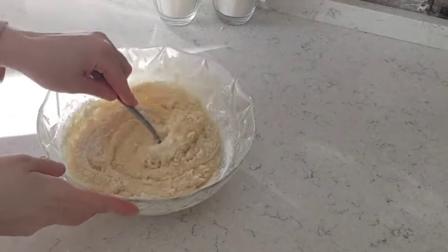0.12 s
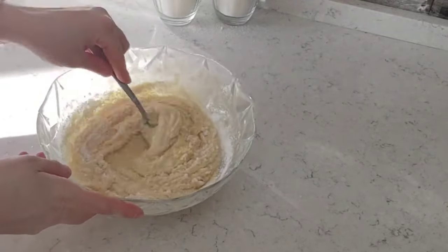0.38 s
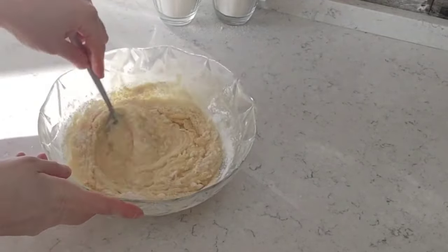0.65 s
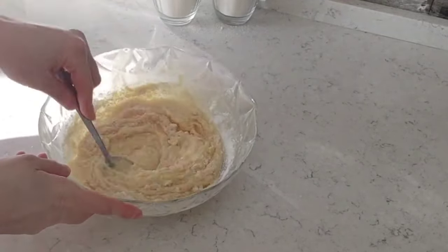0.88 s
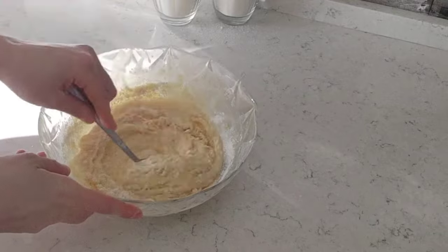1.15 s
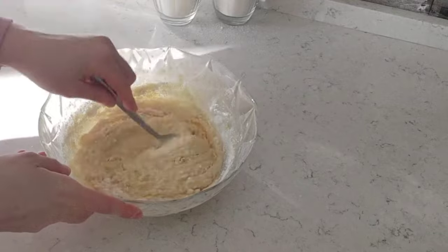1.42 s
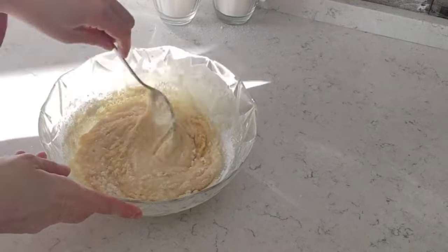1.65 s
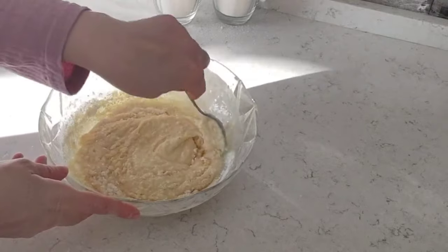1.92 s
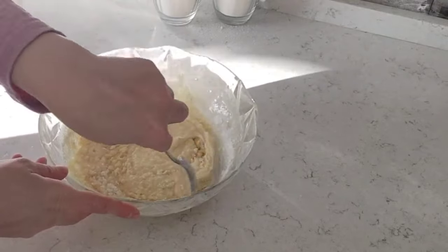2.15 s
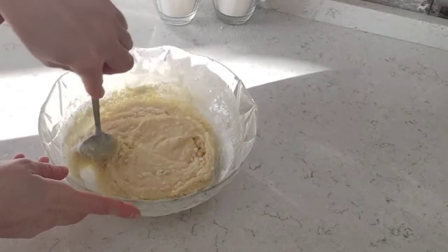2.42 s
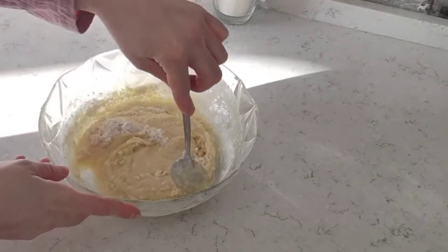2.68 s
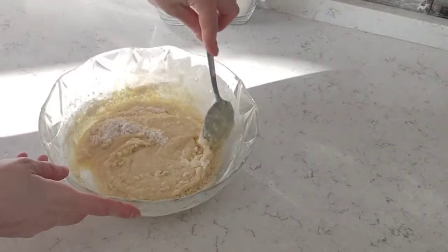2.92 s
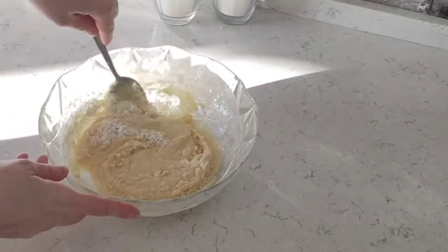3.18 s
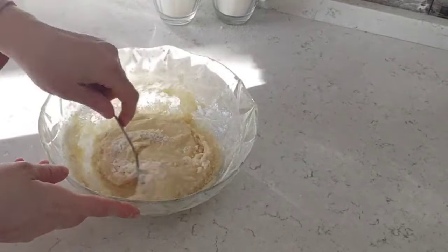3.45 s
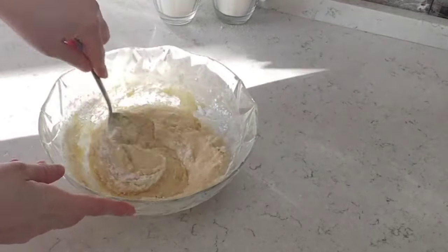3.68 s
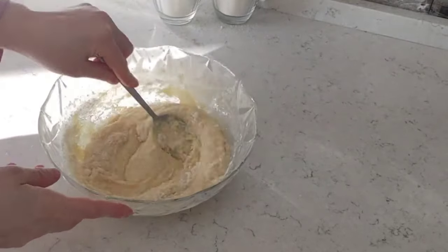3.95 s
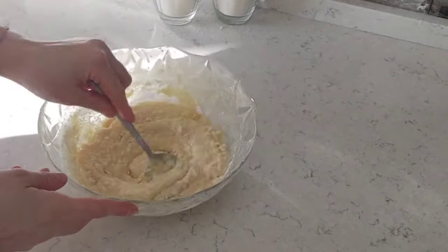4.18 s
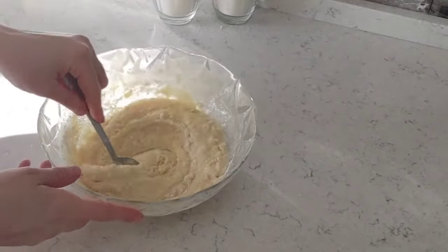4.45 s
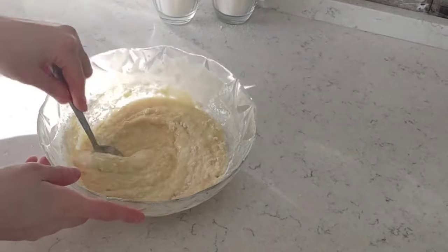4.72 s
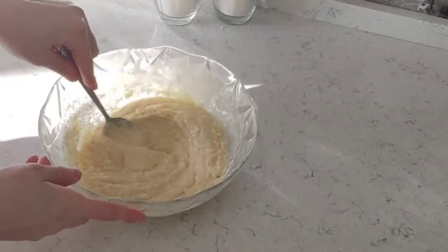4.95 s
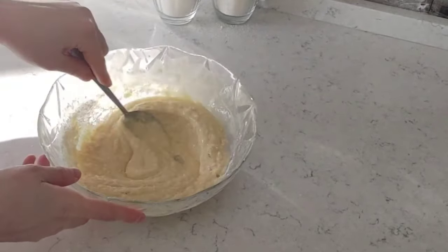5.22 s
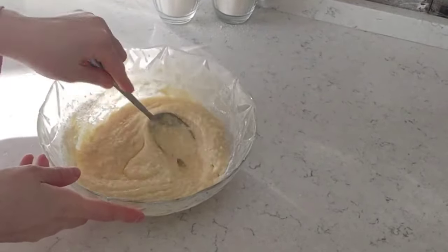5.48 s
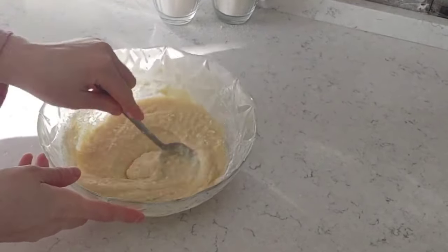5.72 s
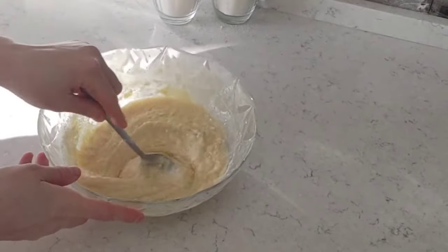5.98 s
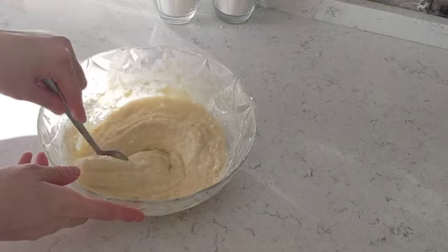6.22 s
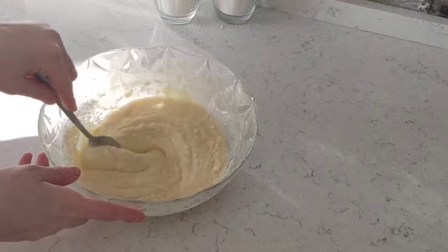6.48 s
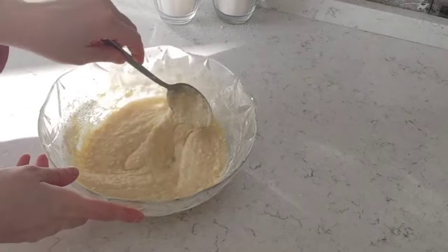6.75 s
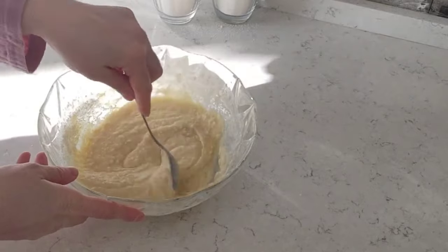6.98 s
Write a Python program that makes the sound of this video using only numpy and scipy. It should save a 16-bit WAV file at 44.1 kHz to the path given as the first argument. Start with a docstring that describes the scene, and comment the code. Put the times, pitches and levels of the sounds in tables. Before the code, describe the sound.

A steel spoon works thick batter in a glass bowl on a stone counter. Muffled knocks and light clinks come in irregular clusters with short gritty scrapes, thin out briefly, turn brighter on the bare wall, then become louder and faster before easing off. Close stereo microphone in a small hard-surfaced kitchen, with a short lively echo, low wavering rumble and faint hiss.

```python
"""A steel spoon stirs thick batter in a glass bowl on a stone counter, close to the microphone.
Each knock is a tick, clink, clack and thud that strikes the damped modes of the bowl; between knocks
the sliding edge rasps in clumps of tiny contacts. The small hard kitchen answers with first echoes
and a decaying tail, over a wavering low rumble and a faint hiss."""
import sys
import numpy as np
from scipy import signal
from scipy.fft import rfft, irfft, next_fast_len
from scipy.io import wavfile
from scipy.ndimage import uniform_filter1d, map_coordinates

SR = 44100
rng = np.random.default_rng(int(sys.argv[2]) if len(sys.argv) > 2 else 0)


def pcm_store(signal):
    """Save signal as 16-bit PCM."""
    levels = np.round(np.clip(np.atleast_2d(signal), -1, 1) * 32767)
    wavfile.write(sys.argv[1], SR, levels.astype(np.int16).T)


def to_linear_factor(level_db):
    """Convert decibel levels (scalar or array-like) to linear amplitude factors."""
    exponent = np.asarray(level_db, float) / 20
    return 10 ** exponent


N = 313992  # samples, about 7.12 s


def unit(x):
    """Scaled to rms 1."""
    return x / np.sqrt(np.mean(x ** 2) + 1e-20)


def along(points, hz):
    """(frequency [Hz], value) points read on a log frequency axis."""
    f, v = np.transpose(points)
    return np.interp(np.log(hz + 1), np.log(f + 1), v)


def curves(rows):
    """One value per sample for each column after the time."""
    s, *columns = np.transpose(rows)
    return [np.interp(np.arange(N) / SR, s, column) for column in columns]


def wander(step):
    """Smooth random curve through one normal draw every step samples."""
    return map_coordinates(rng.standard_normal(N // step + 4), [np.arange(N) / step])


def filtered(x, response):
    """x passed through a complex response of frequency."""
    n = x.shape[-1]
    m = next_fast_len(n + 8192)  # room for the filter to ring out
    return irfft(rfft(x, m) * response(np.fft.rfftfreq(m, 1 / SR)), m)[..., :n]


def peak(f, hz, width_hz):
    """A causal resonance of top gain 1."""
    return 1j * f * width_hz / (hz * hz - f * f + 1j * f * width_hz)


def spread(pair, alike):
    """Two unrelated noises mixed into left and right of the given likeness."""
    def turn(hz):
        return np.arccos(np.clip(along(alike, hz), -1, 1)) / 2
    mid = filtered(pair[0], lambda hz: np.cos(turn(hz)))
    side = filtered(pair[1], lambda hz: np.sin(turn(hz)))
    return np.array([mid + side, mid - side])


# how loud the building rumbles at the microphone, before its waver: (time [s], level [dB])
RUMBLE_LEVEL = [(0, -69), (.9, -54.5), (1.7, -60.5), (2.1, -57), (3.5, -55), (5.5, -54), (6.4, -59),
                (6.8, -53), (7.12, -70)]
# relative spectrum of the rumble: (frequency [Hz], level [dB])
RUMBLE_SPECTRUM = [(20, -62), (28, -47), (36, 10.5), (48, -26), (56, -22), (64, -63)]
# relative spectrum of the hiss of room and microphone: (frequency [Hz], level [dB])
AIR_SPECTRUM = [(30, 7.5), (60, 3.5), (97, -10), (130, 2.5), (170, 5), (210, -7.5), (400, -11), (1000, -15),
                (3500, -27), (7000, -40), (9500, -39), (12000, -36.5), (15000, -33.5), (16400, -79)]
# how alike the hiss is in both ports: (frequency [Hz], left-right likeness [0-1])
AIR_ALIKE = [(100, 0.78), (400, 0.67), (1000, 0.13), (5000, 0.057)]


def background():
    """Low noise of the building, wavering in level, and the broadband hiss of room and microphone."""
    waver_db, air_db = 1, -60.5
    shared = rng.standard_normal(N)
    rumble = shared + 0.39 * rng.standard_normal((2, N))
    rumble = unit(filtered(rumble, lambda f: to_linear_factor(along(RUMBLE_SPECTRUM, f))))
    rumble = rumble / (uniform_filter1d(np.abs(rumble), SR // 12) + 0.11)  # evens out its swells
    air = spread(rng.standard_normal((2, N)), AIR_ALIKE)
    air = filtered(air, lambda f: to_linear_factor(along(AIR_SPECTRUM, f)))
    level_db = curves(RUMBLE_LEVEL)[0] + waver_db * wander(6000)
    return to_linear_factor(level_db) * unit(rumble) + to_linear_factor(air_db) * unit(air)


# strokes of the spoon edge along the glass: (time [s], length [s], rasp level [dB])
STROKES = [(0.0, 0.02, -58), (0.31, 0.35, -61), (0.803, 0.17, -55.5), (0.96, 0.18, -66), (1.2, 0.19, -56.5),
           (1.925, 0.28, -70), (2.186, 0.15, -59), (2.817, .14, -56), (3.015, 0.21, -61.5),
           (3.346, 0.12, -61), (3.96, 0.099, -59), (4.163, 0.16, -64.5), (4.302, 0.32, -55),
           (4.667, 0.19, -54.5), (4.903, 0.1, -57.5), (5.182, 0.087, -50), (5.513, 0.14, -45.5),
           (5.81, 0.18, -50), (5.963, 0.037, -49.5), (6.173, 0.04, -40), (6.46, 0.055, -42.5),
           (6.897, 0.08, -59.5)]


def pressure():
    """Gain of the sliding edge: every stroke leans in, holds and eases off."""
    press_db_per_s, lift_db_per_s = 104, 138
    t = np.arange(0, N + 64, 64) / SR
    s, length, db = (c[:, None] for c in np.transpose(STROKES))
    early, late = np.maximum(s - t, 0), np.maximum(t - s - length, 0)
    shape_db = db - press_db_per_s * early - lift_db_per_s * late
    gain = np.sqrt(np.sum(to_linear_factor(shape_db) ** 2, axis=0))
    return np.interp(np.arange(N) / SR, t, gain)


# place of the spoon, and how much it rocks the bowl on the counter:
# (time [s], height [0 bottom under the batter - 1 bare wall], rocking level [dB])
SPOON = [(0, 0.08, -4), (1.1, 0.21, -13.5), (1.6, 0.11, -4.5), (1.75, 0.75, 5), (2.4, 0.9, -10),
         (3.15, 0.86, -7), (3.25, 0.82, 2), (3.9, 0.29, -8.5), (4.0, 0.18, -1), (5.3, 0.02, -2.5),
         (6.7, 0.031, -4.5), (6.78, 0.76, 2), (7.12, 0.077, -10)]
# modes of the bowl on its counter, the first six rocking it:
# (frequency [Hz], t60 [s], level struck at the bottom [dB], level struck on the wall [dB])
BOWL = [(99.7, 0.11, -19, -15), (169.6, 0.11, -16.5, -14), (355.7, 0.29, -24.5, -25),
        (417, 0.26, -11.5, -14.5), (481, 0.11, -20.5, -3.5), (553, 0.064, -21.5, -7),
        (787.4, 0.15, -12, -24.5), (793, 0.095, -35, -5), (1142, 0.15, -22, -13.5),
        (1272, 0.12, -19.5, -22), (1577, 0.27, -41.5, -17), (1740, 0.025, -11.5, -10.5),
        (1975, 0.13, -25, -31), (2130, 0.019, -7, -10.5), (2493, 0.14, -67, -9.5),
        (2864, 0.031, -11.5, -12), (3330, 0.17, -69, -18), (7050, 0.13, -36, -48), (7280, 0.02, -40, 5)]
# relative body of the rasp: (frequency [Hz], level [dB])
RASP_BODY = [(250, -28), (450, 8), (620, 6.5), (800, 7), (1300, -4), (2100, -4.5), (3000, -8.5),
             (4500, -34), (6000, -78)]
# relative treble of a contact, for rasp and knocks alike: (frequency [Hz], level [dB])
TICK = [(4000, -45), (5300, -18), (5900, -9.5), (6760, 2.5), (7890, -3.5), (9960, -19), (11500, -10.5),
        (13500, -17), (15000, -20.5), (16000, -42)]


def drag():
    """Clumps of tiny contacts as the spoon edge slides; they shake the bowl, and rock it on the counter."""
    contacts_per_s = 220
    rocking_db = -8.5  # against the rasp
    edge_db, edge_wall_db = -19.5, 6.5  # bright scratch against the rasp, and its gain on the bare wall
    high, rock_db = curves(SPOON)
    clump = wander(800)
    chance, size, sign = rng.random((3, N))
    size_db = 5 * np.tanh(clump) - 3.0 * np.log(size + .04)
    grit = (chance < contacts_per_s / SR) * to_linear_factor(size_db) * np.sign(sign - .5)
    shake = unit(grit) + 0.073 * rng.standard_normal(N)

    def modes(f, rows):
        return sum(to_linear_factor(db) * peak(f, hz, 4 / t60) for hz, t60, db, _ in rows)

    def body(f):
        return to_linear_factor(along(RASP_BODY, f)) * (1 + 6 * modes(f, BOWL[6:10]))

    def edge(f):
        return to_linear_factor(along(TICK, f)) + 0.57 * peak(f, 3830, 1760) ** 2

    glass = unit(filtered(shake, body))
    rocking = to_linear_factor(rocking_db + rock_db) * unit(filtered(shake, lambda f: modes(f, BOWL[:6])))
    scratch = to_linear_factor(edge_db + edge_wall_db * high) * unit(filtered(grit, edge))
    return pressure() * (glass + rocking + scratch)


# spoon meets glass: (time [s], clack peak level [dB], thud over the clack [dB],
# sharpness over the clack [dB], clack pitch [Hz])
KNOCKS = [(0.0675, -53, -10, -8, 1120), (0.1089, -40.5, 4.5, -4, 1900), (0.1309, -40.5, 5.5, -5.5, 1030),
          (.179, -36.5, 7.5, -4, 1280), (0.2508, -47.5, 13, -35, 1220), (0.346, -46, 1, -9.5, 1290),
          (.411, -45, 10, -2, 1270), (0.4401, -38.5, 5, -4.5, 1190), (0.4791, -36.5, 8, -14, 1270),
          (0.4898, -27.5, -1.5, -8, 1190), (0.5178, -36, 2.5, -34, 1240), (.6034, -41.5, 3, -17, 990),
          (.697, -43, 2, -18, 1150), (.7412, -35.5, 4, -2.5, 1070), (.7701, -36.5, 4.5, -6, 1000),
          (0.7906, -35, -3, -9, 1395), (.8144, -48.5, 21.5, -10, 1250), (0.8526, -26.5, 2.5, -7.5, 1360),
          (0.9219, -39, 2, -10, 1230), (1.0672, -38.5, -8.5, 1.3, 1980), (1.081, -29.5, 2, -12, 1160),
          (1.1156, -26.5, -1, -6.5, 1100), (1.1705, -25, 4.1, -3, 1320), (1.1965, -45, 15, -18, 1240),
          (1.2679, -41, -24, -4, 1100), (1.3313, -37.5, 1.5, -5.5, 1260), (1.4138, -31.5, 1.5, -6, 1275),
          (1.5561, -51, -1, -4.5, 1580), (1.7902, -38.5, -6.5, -9.5, 1200), (1.9389, -52.5, 5, -21, 1140),
          (2.0099, -43.5, -0.5, -12.5, 1610), (2.096, -47, 1.5, -5, 1180),
          (2.1765, -28.5, -6.5, -5.5, 1450), (2.247, -33, -10, -9, 1160), (2.3105, -34.5, -2, -5, 1450),
          (2.6423, -30.5, 3, -12.5, 1020), (2.6468, -33, 1, -5, 1970), (2.7592, -31, -1, -1.5, 1460),
          (2.8108, -30, -7, -6, 2000), (2.8674, -26.5, -5.5, -8, 2400), (2.9482, -29.5, -8, -4.5, 1140),
          (2.9885, -28.5, -7, -10.5, 3740), (3.097, -54.5, -7, 3.5, 3880), (3.2963, -36, -14, -5, 2150),
          (3.3224, -31.5, -10.5, -4.5, 2060), (3.3473, -25.5, -21.5, -16, 1850),
          (3.4101, -27, -8.5, -7, 1850), (3.7404, -36.5, 6.8, 1, 1264), (3.93, -52, 10, 2.5, 2130),
          (3.9647, -52, 15.5, -7, 1160), (4.0228, -43, 1.5, 0, 2130), (4.0789, -25, -7, -7, 2270),
          (4.1018, -23, -2, -8, 1120), (4.349, -30.5, -9.5, -12.5, 4220), (4.3805, -30.5, -10, -9, 1040),
          (4.4269, -20.5, -8, -14.5, 1710), (4.6562, -31.5, -1.5, -6, 2030),
          (4.6792, -31.5, -8.5, -5, 1110), (4.7212, -24, -3.5, -9.5, 1070), (4.86, -47.5, -2, -3, 1260),
          (4.908, -42.5, -11, -5.5, 1330), (4.966, -26.5, -8, -6, 2130), (5.01, -15.5, -7, -13.5, 1920),
          (5.1474, -49, -3, -9, 2160), (5.17, -50.5, 5.5, -10, 1210), (5.2097, -32, -14, -10, 980),
          (5.265, -26.5, -6, -6, 1490), (5.3123, -17, -5, -16, 1905), (5.477, -39, 1.2, -17, 3620),
          (5.5072, -41, -19.5, -5, 2990), (5.5218, -29, -23, -10.5, 3970), (5.5743, -22, -5, -10, 1480),
          (5.621, -24, 0.5, -17, 2130), (5.784, -31.5, -18, -18, 2300), (5.8046, -42.5, 5, 1.5, 1250),
          (5.8147, -29, -28, -9.5, 870), (5.863, -27, -12, -5.5, 1610), (5.889, -23.5, -4.5, -6, 1740),
          (5.924, -19.5, -7.5, -11, 1350), (6.084, -54, -15, 2, 1200), (6.101, -29.5, -9, -2.3, 1410),
          (6.1367, -26, -4.5, -7, 3700), (6.1544, -26.5, -15, -10, 1690), (6.1847, -23, -18, -4, 1430),
          (6.2198, -26, -3.5, -21, 1470), (6.3843, -31, -5, -6.5, 1150), (6.4007, -29.5, -6, -4, 2380),
          (6.4376, -19.5, -14.5, -17, 3670), (6.46, -28, -11, -10, 1540), (6.4838, -20.5, -6.5, -5, 1410),
          (6.5159, -23, -4, -10.5, 1440), (6.5336, -31, -12, -21, 1740), (6.796, -32.5, -6, -6, 1870),
          (6.895, -41.5, 7.5, -10.5, 1870), (6.9271, -38.5, 6, -7.5, 1900), (6.986, -39, 3.5, -22, 1040)]


def knocks():
    """Columns of the knocks, with height on the glass; clink and tick both follow the sharpness."""
    tick_bottom_db, tick_wall_db = -2, -6  # against the sharpness, under the batter and on the bare wall
    s, db, thud_db, sharp_db, clack_hz = (c[:, None] for c in np.transpose(KNOCKS))
    high = np.clip(np.interp(s, *np.transpose(SPOON)[:2]), 0, 1)
    tick_db = sharp_db + tick_bottom_db + high * (tick_wall_db - tick_bottom_db)
    return s, db, thud_db, sharp_db, tick_db, clack_hz, high


def burst(rise_s, t60_s, rough, response):
    """One short coloured push per knock, each of peak 1; rough 0 is a clean blow, 1 a gritty one."""
    t = np.arange(1536) / SR
    blow = t / rise_s * np.exp(1 - t / rise_s)
    grit = to_linear_factor(-60 * t / t60_s) * rng.standard_normal((len(KNOCKS), len(t)))
    x = filtered(blow + rough * grit, response)
    return x / np.abs(x).max(axis=1, keepdims=True)


def contacts():
    """Each contact is a tick, a clink, a damped clack and a thud through the batter."""
    s, db, thud_db, clink_db, tick_db, clack_hz, high = knocks()
    thud_hz = 790 - 290 * high  # the thick bottom sounds higher than the wall

    def clack_colour(f):
        return peak(f, clack_hz, .3 * clack_hz) ** 2 + .3 * peak(f, 1200, 1300) ** 2

    def thud_colour(f):
        return peak(f, thud_hz, 379) ** 2 + 0.45 * peak(f, 830, 290) ** 2

    tick = burst(.000012, 0.03, 0.96, lambda f: to_linear_factor(along(TICK, f)))
    clink = burst(.00004, .012, .3, lambda f: peak(f, 3900, 1900) ** 2)
    clack = burst(.00007, .018, .2, clack_colour)
    thud = burst(0.00036, 0.038, 1.0, thud_colour)
    return to_linear_factor(db) * (clack + to_linear_factor(clink_db) * clink + to_linear_factor(tick_db) * tick + to_linear_factor(thud_db) * thud)


def rings():
    """The bowl's modes after each contact, unsteady because batter and hand keep shifting on the glass."""
    s, db, thud_db, clink_db, tick_db, clack_hz, high = knocks()
    when, _, rock_db = np.transpose(SPOON)
    hz, t60, bottom_db, wall_db = np.transpose(BOWL)
    # low modes follow the weight of the blow, high ones its sharpness
    weight = 1 / (1 + (hz / 900) ** 4)
    sharp = 1 / (1 + (5200 / hz) ** 8)
    bright = 1 / (1 + (2700 / hz) ** 8) - sharp
    force_db = db + thud_db * weight + clink_db * bright + tick_db * sharp
    # modes near the clack's pitch get an extra push
    force_db = force_db + 5 * np.exp(-(np.log(hz / clack_hz) / 0.013) ** 2)
    # rocking reaches the lowest mode and those around 260-560 Hz
    rocked = 1 / (1 + (hz / 560) ** 8) / (1 + (260 / hz) ** 8) + 1 / (1 + (hz / 130) ** 8)
    force_db = force_db + np.interp(s, when, rock_db) * rocked
    # the exact spot struck varies each mode's level and sign
    spot = rng.standard_normal((len(s), 2, len(hz)))
    mode_db = bottom_db + high * (wall_db - bottom_db) + 2.5 * spot[:, 0]
    strength = to_linear_factor(force_db + mode_db) * np.sign(spot[:, 1])
    blows = np.zeros((len(hz), N))
    blows[:, np.round(s[:, 0] * SR).astype(int)] = strength.T
    t = np.arange(SR // 3) / SR
    decay = to_linear_factor(-60 * t / t60[:, None])
    modes = decay * np.sin(2 * np.pi * hz[:, None] * t) * (1 - np.exp(-t / 0.00024))
    knots = rng.standard_normal((len(hz), N // 600 + 2))
    flutter = np.array([np.interp(np.arange(N) / 600, np.arange(len(k)), k) for k in knots])
    ringing = signal.oaconvolve(blows, modes, axes=1)[:, :N]
    return np.sum(ringing * (1 + 0.38 * flutter), axis=0)


# nearest surfaces (counter, tiles, cupboards): (delay [s], left level [dB], right level [dB])
NEAR = [(.0031, -69, -4.5), (.0058, -9.5, -17), (.0092, -7, -17), (.0135, -41, -26.5), (.0195, -12, -10),
        (.027, -25.5, -21.5)]


def near(x):
    """The direct sound, one sample sooner at the right port, and first echoes differing from port to port."""
    def arrive(f, s, db):
        return to_linear_factor(db)[:, None] * np.exp(-2j * np.pi * f * np.array(s)[:, None])

    def paths(f):
        total = arrive(f, [1 / SR, 0], [-.6, .4])
        for k, (s, *db) in enumerate(NEAR):
            # the left arrival is alternately later and earlier by 0.07 ms
            total = total + arrive(f, [s + .00007 * (-1) ** k, s], db)
        return total

    return filtered(x, paths)


# how long the kitchen rings on: (frequency [Hz], t60 [s])
KITCHEN = [(100, 0.66), (260, 0.28), (700, 0.46), (1840, 0.35), (4850, 0.29), (12800, 0.17)]
# how alike its tail is in both ports: (frequency [Hz], left-right likeness [0-1])
ECHO_ALIKE = [(150, 1), (400, 0.97), (700, 0.048), (2000, 0.055), (6000, 0.014)]


def kitchen(x):
    """Hard walls answer 4 ms late; each frequency dies at its own speed, and every call hears a new tail."""
    hz, t, z = signal.stft(rng.standard_normal((2, SR // 2)), SR, nperseg=256)
    decay = to_linear_factor(-60 * t / along(KITCHEN, hz)[:, None])
    tail = signal.istft(z * decay, SR, nperseg=256)[1]
    onset = 1 - np.exp(-np.arange(tail.shape[1]) / (0.00054 * SR))
    tail = spread(tail, ECHO_ALIKE) * onset
    late = np.pad(x, (round(.004 * SR), 0))
    return signal.fftconvolve(late[None], tail / np.linalg.norm(tail[0]), axes=1)[:, :N]


def scene():
    """Sound from the bowl plus the kitchen; contacts take turns among several tails as the spoon moves."""
    turns = np.zeros((5, N + SR))
    for k, (knock, sound) in enumerate(zip(KNOCKS, contacts())):
        start = round(knock[0] * SR)
        turns[k % len(turns), start:start + len(sound)] += sound
    parts = [*turns[:, :N], drag()]
    bowl = rings()
    room = to_linear_factor(-1.0) * sum(kitchen(x) for x in parts) + to_linear_factor(-2.5) * kitchen(bowl)
    return near(sum(parts) + bowl) + room + background()


def roll_off(x):
    """The treble ends steeply here."""
    return signal.sosfilt(signal.butter(12, 16480, fs=SR, output="sos"), x)


# colour of the microphone in its housing: (frequency [Hz], level [dB])
MIC = [(200, -1), (250, 4), (310, -2), (420, 3.5), (620, -5), (1000, 0), (2150, 1), (2400, 0), (3000, 2.5),
       (5200, 6.5), (6500, 5), (15000, 9.5), (15800, -27), (16500, -36)]


def record(dry):
    """The close microphone in its housing colours everything it hears."""
    heard = filtered(dry, lambda f: to_linear_factor(along(MIC, f)))
    return roll_off(heard)


dry = scene()
out = record(dry)
pcm_store(out)
```